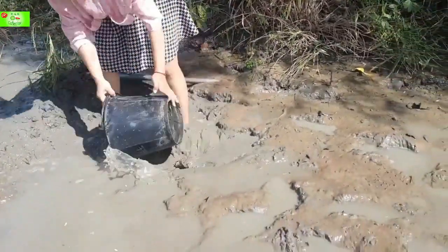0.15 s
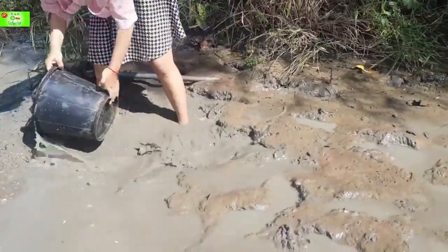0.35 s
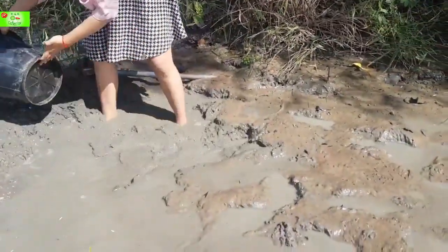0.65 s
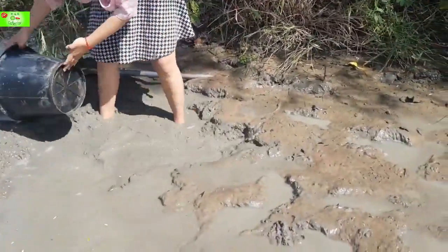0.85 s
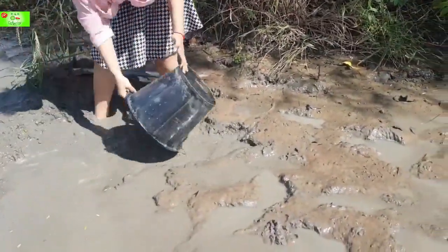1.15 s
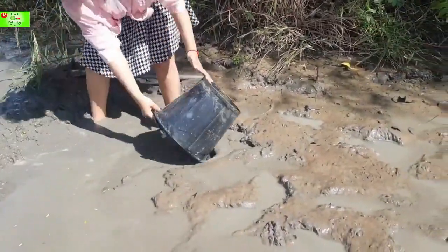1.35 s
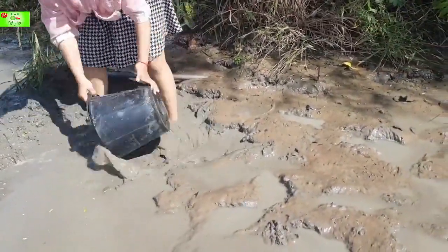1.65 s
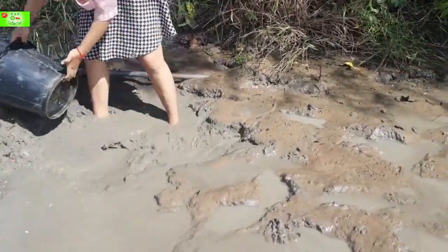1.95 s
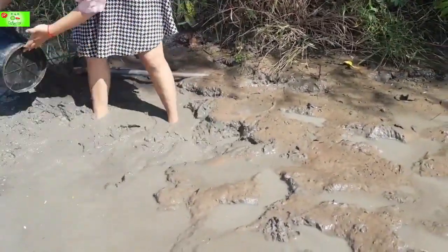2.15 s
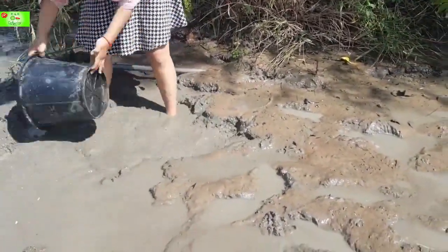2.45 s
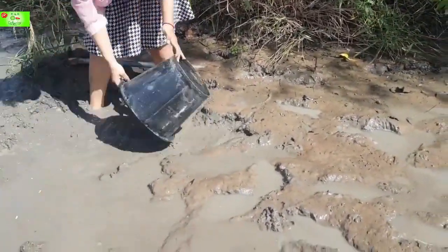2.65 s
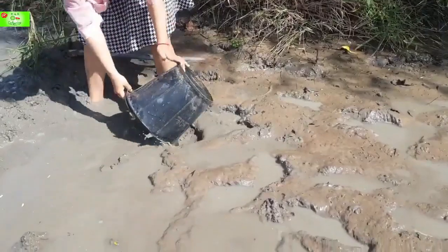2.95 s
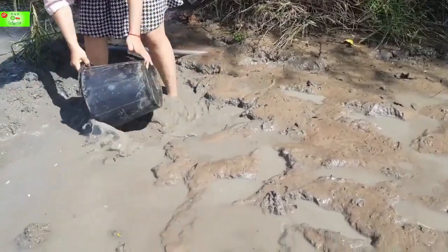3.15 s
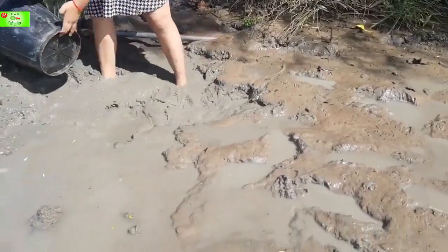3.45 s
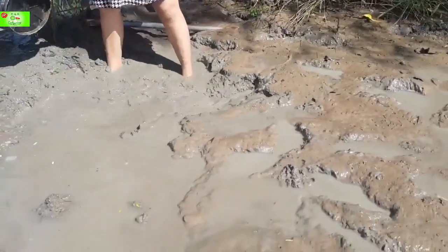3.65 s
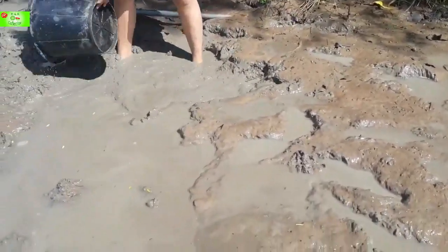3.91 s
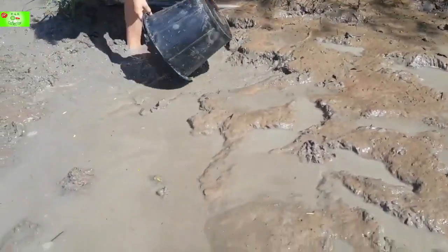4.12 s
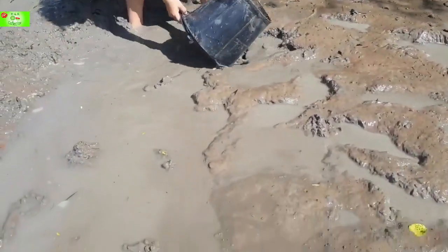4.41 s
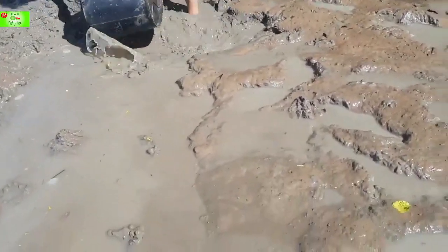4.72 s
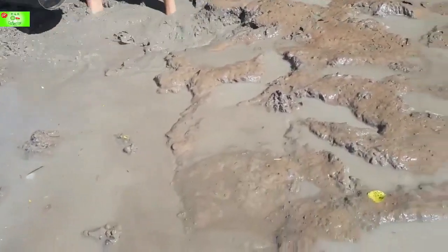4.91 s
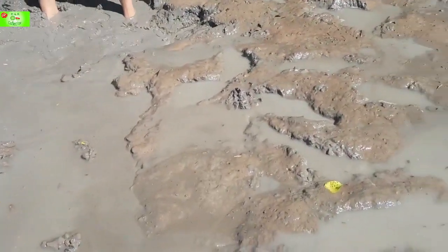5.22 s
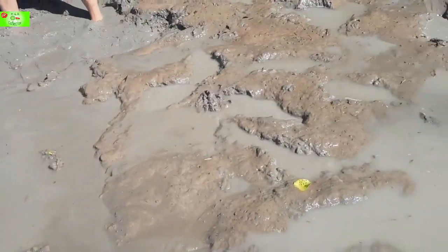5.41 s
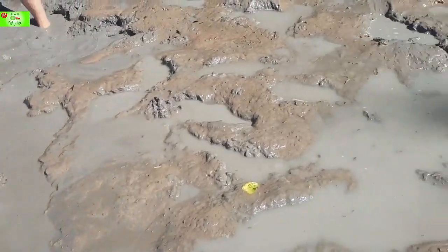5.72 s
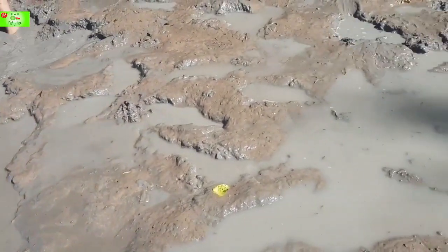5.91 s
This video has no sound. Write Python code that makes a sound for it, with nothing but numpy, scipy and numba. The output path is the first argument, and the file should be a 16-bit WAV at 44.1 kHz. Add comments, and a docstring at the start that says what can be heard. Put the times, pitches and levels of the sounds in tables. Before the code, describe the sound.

Four rhythmic bucket throws in a shallow muddy pool: low glug, quick swish, then a bubbly wet crash, with drips and quiet gaps between.

```python
"""Water in a shallow muddy pool is bailed with a plastic bucket: four swings, each a gulp as the rim dips, a swish
as it scoops, and a thrown sheet that patters and slaps down further left. Bubbles and droplets are short ringing
tones, fine spray is a crowd of tiny ones, and slaps are fading bursts of noise. A phone with two ports hears it
in the open air, with a muddy bank that scatters the sound, a little wind and a faint hush behind."""
import sys
import numpy as np
from scipy import signal
from scipy.fft import rfft, irfft
from scipy.io import wavfile
from scipy.ndimage import uniform_filter1d, map_coordinates
from numba import njit

SR = 44100
rng = np.random.default_rng(int(sys.argv[2]) if len(sys.argv) > 2 else 0)


def put_to_file(sound):
    """Save the sound as 16-bit audio at rate SR, in the file named by the first command-line argument."""
    columns = np.atleast_2d(sound).T  # one column per channel
    safe = np.clip(columns, -1, 1)
    whole_steps = np.round(safe * 32767)
    wavfile.write(sys.argv[1], SR, whole_steps.astype(np.int16))


N = 267687
T = np.arange(N) / SR  # time in seconds

# The bucket scoops. Each row: rim dips in seconds, rim leaves the water in seconds, stir in dB, swish in dB,
# reach of the swing as extra lead of the left port in ms.
SCOOPS = [(0.076, 0.444, 5.5, -6, 0.32), (1.528, 1.906, -2, 1, 0.33), (3.02, 3.409, -3, 1, 0.28),
          (4.556, 4.917, -1.5, -1.5, 0.46)]
# The thrown water comes down. Each row: first drops in seconds, main sheet in seconds, last drops in seconds,
# crash in dB, crash length in seconds, churn in dB, extra droplets in dB, coarse spray in the crash in dB,
# middle bubble pitch in Hz.
THROWS = [(0.56, 0.878, 1.036, -2.5, 0.034, 0, 1, -4.5, 626),
          (2.14, 2.395, 2.557, -1, 0.035, 2, 0.5, -3.5, 605),
          (3.58, 3.91, 4.079, 2.5, 0.034, -1, 0, -2, 645),
          (5.06, 5.385, 5.53, -1, 0.074, -0.5, -1.5, 3.5, 583)]
SCOOP_S = 0.057  # how long the stir of a scoop holds, in seconds
SCOOP_SLOPES = (58, 31)  # its rise and fall, in dB per second


def undb(db):
    """Turn decibels into a gain."""
    return 10 ** (np.asarray(db) / 20)


def curve(rows, at=T):
    """Join the columns of a table by straight lines in time."""
    s, *columns = np.transpose(rows)
    return [np.interp(at, s, column) for column in columns]


def unit(x):
    """Scale a sound to rms 1."""
    return x / np.sqrt(np.mean(x ** 2))


def steady(x, span_s):
    """Even out the slow level of a texture and keep its grain."""
    power = np.mean(x ** 2, axis=0)
    for _ in range(2):
        power = uniform_filter1d(power, max(int(span_s * SR), 2))
    return x / np.sqrt(np.abs(power) + 1e-4 * power.mean())


def colour(x, points, size=2048):
    """Filter through (Hz, dB) points without any sound ahead of its cause."""
    hz, db = np.transpose(points)
    grid = np.maximum(np.arange(size // 2 + 1) * SR / size, 1)
    cepstrum = irfft(np.log(undb(np.interp(np.log(grid), np.log(hz), db))))
    # folding the cepstrum puts the whole response after time zero
    cepstrum[1:size // 2] *= 2
    cepstrum[size // 2 + 1:] = 0
    response = irfft(np.exp(rfft(cepstrum)))
    return signal.oaconvolve(x, response[None], axes=1)[:, :N]


def walk(corner_hz):
    """Smooth random wandering with spread 1, no faster than about the corner."""
    lowpass = signal.butter(2, corner_hz, fs=SR, output="sos")
    return unit(signal.sosfilt(lowpass, rng.standard_normal(N)))


def bursts(rows):
    """Noise that starts at once and fades, for rows of start in seconds, level in dB, fade time in seconds."""
    force, t = np.zeros(N), T[:SR // 10]
    for s, db, fade in rows:
        first = int(s * SR)
        force[first:first + len(t)] += undb(db) * np.exp(-t / fade)
    return (force * rng.standard_normal(N))[None]


def bearing(at=T):
    """Lead of the left port in ms: it grows as each swing carries the water to the left."""
    dip_lead_ms, carry_s = 0.045, 0.63  # lead at the dip; pace of the swing to the left
    return_s = 0.18  # the bucket is back this long before a dip
    dip, *_, reach = np.transpose(SCOOPS)
    k = np.maximum(np.searchsorted(dip - return_s, at) - 1, 0)  # which swing it is
    carried = 1 - np.exp(-np.maximum(at - dip[k], 0) / carry_s)
    return dip_lead_ms + reach[k] * carried


def ports(x):
    """One source as both ports hear it: the right one hears it later."""
    lead = bearing() * SR / 1000
    return np.array([x, map_coordinates(x, [np.arange(N) - lead], order=3)])


@njit
def rings(start, hz, cycles, size, rise, onset):
    """Damped sines that speak within `onset` cycles and whose pitch climbs by `rise` in each decay time."""
    out = np.zeros(N)
    for k in range(len(start)):
        life = cycles[k] / hz[k]
        first = max(int(start[k] * SR) + 1, 0)
        last = min(int((start[k] + 5 * life) * SR), N)
        for i in range(first, last):
            t = i / SR - start[k]
            age = t / life
            level = size[k] * min(t * hz[k] / onset, 1.) * np.exp(-age)
            out[i] += level * np.sin(2 * np.pi * hz[k] * t * (1 + rise * age / 2))
    return out


def grains(start, hz, cycles, size, rise, onset, stray_ms=0):
    """Rings as both ports hear them, each with the lead of its own place."""
    lead = (bearing(start) + stray_ms) / 1000
    return np.array([rings(start + side * lead / 2, 1. * hz, 1. * cycles, 1. * size, float(rise), float(onset))
                     for side in (-1, 1)])


def shower(flow_db, low_hz, high_hz, cycles, rise, spread_db, stray_ms, full_db, count):
    """Random grains with pitches between two limits; the stronger the flow, the more of them."""
    when, keep, pitch, damp, big, sign, aside = rng.random((count, 7)).T
    start = when * N / SR
    strength, low, high = (np.interp(start, T, np.broadcast_to(c, N)) for c in (flow_db, low_hz, high_hz))
    live = keep < undb(.7 * (strength - full_db))
    hz = low * (high / low) ** pitch
    turns = cycles * 2 ** (2 * damp - 1)
    # small bubbles die sooner, so they start louder to carry the same energy
    size = undb(-spread_db * np.log(0.0099 + big)) * np.sqrt(hz / turns)
    size = np.sign(sign - .5) * size
    stray = stray_ms * np.log((aside + 1e-6) / (1 - aside))
    return grains(start[live], hz[live], turns[live], size[live], rise, 0.43, stray[live])


def stage(start, end, slopes):
    """Level in dB of something that rises, holds from start to end, and falls."""
    rise, fall = slopes
    return -rise * np.maximum(start - T, 0) - fall * np.maximum(T - end, 0)


def flow():
    """Strength in dB of spray, droplets and bubbles: swings scoop, swish out, patter, crash and churn the pool."""
    # what each stage stirs up: spray, droplets and bubbles, in relative dB
    trickle_db, scoop_db, swish_db = (-53, -54.5, -67), (-54.5, -63, -58.5), (-37, -39.5, -44)
    patter_db, crash_db, churn_db = (-38.5, -38.5, -45), (-28, -30, -43), (-39.5, -34.5, -34)
    # how fast each stage comes and goes: rise and fall in dB per second
    swish_slopes, patter_slopes = (119, 190), (82, 106)
    crash_slopes, churn_slopes = (243, 720), (72.6, 95)
    swish_s, churn_s = 0.015, 0.074  # how long these stages hold
    drained_s, drain_db_per_s = 5.66, 28  # the trickle dies away after the last throw

    parts = [(trickle_db, -drain_db_per_s * np.maximum(T - drained_s, 0))]
    for dip, leave, stir, swish, _ in SCOOPS:
        parts += [(scoop_db, stage(dip, dip + SCOOP_S, SCOOP_SLOPES) + stir),
                  (swish_db, stage(leave - swish_s, leave, swish_slopes) + swish)]
    for first, land, last, crash, crash_s, churn, droplets, _, _ in THROWS:
        breakup = np.array([0, droplets, 0])
        parts += [(breakup + patter_db, stage(first, last, patter_slopes)),
                  (breakup + crash_db, stage(land - crash_s, land, crash_slopes) + crash),
                  (breakup + churn_db, stage(land - churn_s, land, churn_slopes) + churn)]
    power = sum(np.outer(undb(mix) ** 2, undb(level) ** 2) for mix, level in parts)
    return 10 * np.log10(power)


def bubble_pitch():
    """Typical pitch in Hz of churned bubbles: it falls through each throw, and is lowest under the sunk bucket."""
    deepen = 2 ** 0.21  # start 0.21 octave above a throw's pitch, end as far below, as the water digs in
    sunk_hz, sunk_s = 384, 0.102  # pitch under the bucket; half its time under water
    points = []
    for first, _, last, *_, hz in THROWS:
        points += [(first, hz * deepen), (last, hz / deepen)]
    open_hz = curve(points)[0]
    sunk = sum(np.exp(-((T - dip - SCOOP_S / 2) / sunk_s) ** 4) for dip, *_ in SCOOPS)
    return open_hz + (sunk_hz - open_hz) * sunk


def coarseness():
    """Coarse spray in dB relative to the fine: each crash breaks the water up in its own way."""
    patter_db, mist_s = 0.5, 0.11  # mix away from the crashes; how long a crash changes it
    crashes = sum((db - patter_db) * np.exp(-((T - land) / mist_s) ** 2) for _, land, *_, db, _ in THROWS)
    return patter_db + crashes


def water(spray_db, droplet_db, bubble_db):
    """Churned air rings as bubbles, falling droplets patter, and fine spray crackles; all come in clumps."""
    # Tone colour of the fine spray. Each row: frequency in Hz, level in dB.
    spray_colour = [(700, -17), (1550, -9.5), (1950, 1), (2450, -4), (3200, 2), (4000, 1), (5400, -4.5),
                    (7800, -4), (10000, -7.5), (12500, -5), (15500, -11)]
    # Tone colour of the churned bubbles. Each row: frequency in Hz, level in dB.
    bubble_colour = [(100, -18), (250, -5), (400, -0.5), (600, 3), (730, 4), (900, 4), (1400, -21.5)]
    droplet_colour = [(600, 7.5), (1150, 1.5), (2000, -3.5), (3000, 6)]
    churn_hz = bubble_pitch()
    clumps = undb(0.87 * walk(24.3))
    bubbles = shower(bubble_db, 0.645 * churn_hz, 1.392 * churn_hz, cycles=2.13, rise=0.044,
                     spread_db=2.0, stray_ms=0.029, full_db=-40.5, count=4500)
    droplets = shower(droplet_db, 1036, 1917, cycles=2.24, rise=0.092,
                      spread_db=-1.0, stray_ms=0.015, full_db=-40, count=6000)
    spray = shower(spray_db, 1576, 15430, cycles=2.92, rise=0.11,
                   spread_db=3.0, stray_ms=0.026, full_db=-37, count=50000)
    # big drops ring low, mist rings high, and the mix keeps changing
    coarse = signal.sosfiltfilt(signal.butter(3, 4300, fs=SR, output="sos"), spray)
    fine = spray - coarse
    spray = fine + coarse * undb(coarseness() + 0.65 * walk(17.7))
    # even out each texture, then let the flow set its level
    bubbles = steady(colour(bubbles, bubble_colour) * clumps, 0.33) * undb(bubble_db)
    droplets = steady(colour(droplets, droplet_colour) * clumps, 0.24) * undb(droplet_db - 3.0)
    spray = steady(colour(spray, spray_colour) * clumps, 0.09) * undb(spray_db - 1)
    return bubbles + droplets + spray


def drips(fall_db):
    """Stray drops fall from the rim and the hands, and land one by one even between the throws."""
    falling = shower(fall_db, 1385, 6560, cycles=5.4, rise=0.065,
                     spread_db=8.5, stray_ms=0.093, full_db=-60.5, count=420)
    falling = colour(falling, [(400, -20), (1300, -3), (4000, 9.0), (12000, -15.0)])
    return unit(falling) * undb(0.88 * fall_db - 27.5)


def air():
    """Wind buffets each port on its own in uneven puffs, over a distant hush."""
    # Tone colour of the wind. Each row: frequency in Hz, level in dB.
    wind_colour = [(15, -20), (52, 5.5), (115, 0.5), (180, -9), (300, -13.5), (700, -39)]
    # Tone colour of the distant hush. Each row: frequency in Hz, relative level in dB per Hz.
    hush_colour = [(59, -18), (100, -8), (253, -30), (340, -3), (429, -22), (627, -5.5), (1040, -18),
                   (1840, -16), (2090, -22), (2520, -46), (5510, -4), (6390, -12), (9340, -7.5),
                   (13700, -12), (15500, -16)]
    # Strength of the wind on the ports. Each row: time in seconds, relative level in dB.
    gusts = [(0.0, -46), (0.22, -48), (0.34, -58), (0.64, -55), (1.42, -74.5), (1.57, -57), (2.69, -57),
             (2.72, -60.5), (4.06, -56.5), (4.38, -77), (4.58, -56), (4.65, -68), (4.7, -53), (5.14, -45),
             (5.29, -71), (5.34, -46), (5.38, -66), (6.07, -74.5)]
    puffs = colour(rng.standard_normal((2, N)), wind_colour) * undb(5.0 * walk(17.0))
    wind = steady(puffs, 0.2) * undb(curve(gusts)[0] + 2.5)
    hush = unit(colour(rng.standard_normal((2, N)), hush_colour)) * undb(-60.5)
    return wind + hush


def drops():
    """A drop or bursting film cracks on the surface and leaves a tiny ringing bubble."""
    # Single drops and bursting films. Each row: start in seconds, relative level in dB, pitch in Hz,
    # crack in dB on top of that level.
    single_drops = [(0.053, -40.5, 4270, 11), (0.119, -37.5, 3070, -8), (0.8032, -26.5, 3660, -9),
                    (1.277, -42.5, 6350, 6.5), (1.392, -40, 3700, -2), (1.502, -40, 2120, 13.5),
                    (2.822, -34.5, 8160, -7), (3.03, -37.5, 4000, -19), (3.255, -34, 5660, 5),
                    (4.1139, -31, 3650, -4), (4.357, -47, 3360, 14), (4.56, -31.5, 5320, -14),
                    (4.6045, -29, 3200, -23), (5.696, -37.5, 3400, -14), (5.705, -37, 6400, -20)]
    s, db, hz, crack_db = np.transpose(single_drops)
    crack = bursts(zip(s, db + crack_db, np.full(len(s), .0014)))
    crack = colour(crack, [(400, 1), (2000, -6), (4500, -4.5), (15000, -1)])
    bubble = grains(s + 0.000345, hz, np.full(len(s), 5.), undb(db + 7.5), rise=0.011, onset=0.99)
    return ports(crack[0]) + bubble


def plops():
    """Large bubbles break in with a knock and chirp upward as they near the surface."""
    # The largest single bubbles. Each row: start in seconds, relative level in dB, pitch in Hz,
    # cycles to fade to about a third (1/e).
    large_bubbles = [(0.061, -25, 577, 2.8), (0.152, -43, 750, 6.8), (0.195, -37.5, 930, 6.7),
                     (0.271, -41.5, 897, 7), (0.404, -33, 533, 4.6), (0.663, -25, 573, 4.9),
                     (0.752, -41, 645, 2.6), (0.781, -20.5, 536, 6), (0.96, -28, 416, 3.4),
                     (1.197, -41, 620, 9.4), (1.543, -29.5, 1040, 3.6), (1.708, -41, 1160, 9.6),
                     (1.904, -28, 630, 2.1), (1.921, -26, 1130, 5.7), (2.223, -51, 615, 12),
                     (2.28, -26, 570, 5.5), (2.319, -23, 450, 9.3), (2.408, -18.5, 632, 4),
                     (2.899, -35, 1040, 4.7), (2.955, -31, 645, 1.4), (3.164, -32.5, 683, 5),
                     (3.297, -38, 538, 5.9), (3.421, -25.5, 970, 4.2), (3.653, -25, 442, 4.7),
                     (3.848, -26, 570, 7.5), (4.389, -38.5, 455, 2.5), (4.433, -33, 524, 5.4),
                     (4.492, -40, 700, 7.4), (4.524, -31.5, 633, 3.4), (4.623, -33, 487, 4.7),
                     (4.674, -29, 1000, 5.3), (4.844, -30.5, 779, 6.2), (4.897, -17.5, 970, 2.2),
                     (4.995, -33.5, 542, 4.2), (5.084, -29, 620, 7.3), (5.168, -24, 610, 7.6),
                     (5.226, -21, 676, 6.9), (5.262, -22.5, 715, 5.5), (5.313, -27, 645, 11.7)]
    s, db, hz, cycles = np.transpose(large_bubbles)
    knock = grains(s, 1.45 * hz, np.full(len(s), 1.3), undb(db - 1.5), rise=0, onset=0.6)
    chirp = grains(s, hz, cycles, undb(db + 0.5), rise=0.159, onset=1.0)
    return knock + chirp


def gulps():
    """The rim cuts in with a short glug, and the air pocket under it falls in pitch as it opens into the bucket."""
    # The rim dips and traps air. Each row: start in seconds, relative level in dB, pitch the pocket settles to
    # in Hz, swell time in seconds, rim splash in dB on top of the pocket.
    rim_dips = [(0.067, -24.5, 302, 0.0077, -11.5), (0.091, -38.5, 286, 0.0084, -18),
                (1.391, -60, 341, 0.013, 13), (1.542, -33.5, 326, 0.0073, 0), (1.582, -48, 296, 0.015, 5.5),
                (3.020, -37, 366.4, 0.016, 4.5), (3.039, -25.5, 311, 0.004, -14),
                (3.078, -42, 278, 0.014, -2), (4.491, -44, 340, 0.0057, 1), (4.522, -33, 348, 0.0084, -10),
                (4.548, -42.5, 275, 0.017, -2), (4.585, -42.5, 249, 0.016, 4)]
    pocket, splash = np.zeros(N), np.zeros(N)
    for s, db, hz, swell, splash_db in rim_dips:
        t = np.maximum(T - s, 0)[:int((s + .2) * SR)]
        # the pitch starts high and settles within a few ms
        phase = 2 * np.pi * hz * (t + 0.00286 * (1 - np.exp(-t / 0.0013)))
        swelling = (t / swell) ** 2 * np.exp(2 - 2 * t / swell)
        pocket[:len(t)] += undb(db) * swelling * np.sin(phase)
        splash[:len(t)] += undb(db + splash_db) * (1 - np.exp(-t / 0.0021)) * np.exp(-t / 0.011)
    splash_colour = [(150, 14), (400, 22.0), (750, 14.0), (1020, 20.5), (1500, -17), (4000, -1.5), (12000, -12.5)]
    wet = colour((splash * rng.standard_normal(N))[None], splash_colour)
    s, db, hz, _, splash_db = np.transpose(rim_dips)
    glug = grains(s, 3.084 * hz, np.full(len(s), 6.), undb(db + splash_db - 0.5), rise=-0.094, onset=2.7)
    return ports(pocket + wet[0]) + glug


def gurgles():
    """Small bubbles blip one by one in the wake of the bucket."""
    pitch_hz = 913
    wake_db = np.max([stage(dip, leave, SCOOP_SLOPES) for dip, leave, *_ in SCOOPS], axis=0)
    blips = shower(wake_db, 0.6 * pitch_hz, 1.76 * pitch_hz, cycles=3.7, rise=0.158,
                   spread_db=1.5, stray_ms=0.039, full_db=2, count=420)
    return unit(blips) * undb(-58.5)


def slaps():
    """Each lump lands with a sharp burst of crackle and a short thud from the cavity it digs."""
    # Lumps of water slap down. Each row: start in seconds, relative level in dB, fade time in seconds,
    # thud in dB on top of that level.
    lumps = [(0.151, -41, 0.023, -9), (0.545, -27.5, 0.017, 7.5), (0.752, -16.5, 0.0018, 8),
             (0.847, -22.5, 0.0097, -3), (0.871, -18.5, 0.011, -23), (1.993, -36, 0.025, -3),
             (2.35, -16, 0.009, 8), (2.368, -17.5, 0.0099, 11), (2.384, -15, 0.0061, 8),
             (3.842, -10.5, 0.0018, -29), (3.862, -12, 0.0022, 0), (3.883, -22, 0.0011, 10),
             (3.904, -8.5, 0.0045, 5), (3.912, -13, 0.0021, -11), (5.334, -13.5, 0.0037, -1)]
    # Tone colour of the crackle. Each row: frequency in Hz, level in dB.
    slap_colour = [(60, -32.5), (250, 3.5), (550, -4.5), (950, 9), (1400, 15), (2400, -2), (3800, 11),
                   (5500, -1), (8000, -3), (12500, -5.5), (16000, -12)]
    s, db, fade, thud_db = np.transpose(lumps)
    thud_hz = rng.uniform(460, 632, len(s))
    thuds = grains(s, thud_hz, np.full(len(s), 1.5), undb(db + thud_db - 4.5), rise=0.22, onset=0.67)
    crackle = colour(bursts(zip(s, db, fade)), slap_colour)[0]
    return undb(-4) * ports(crackle) + thuds


def bank(x, count=4):
    """Mud ridges scatter the treble along shifting paths; the grassy bank adds a faint short tail."""
    t, out = T[:SR // 4], 0
    fades = np.array([np.exp(-t / 0.0087), np.exp(-t / 0.015)])
    for _ in range(count):
        near, far = rng.standard_normal((2, 2, len(t))) * fades[:, None]
        echo = (undb(-5.0) * unit(near) + undb(-7.0) * unit(far)) / np.sqrt(len(t) * count)
        # each path comes and goes as the water moves
        out = out + signal.oaconvolve(x * walk(15.6), echo, axes=1)[:, :N]
    return colour(out, [(300, -7.5), (1200, -6), (2500, 1), (8000, 3.0)])


def scene():
    """All the water, slightly to the left, in the open air."""
    spray_db, droplet_db, bubble_db = flow()
    pool = water(spray_db, droplet_db, bubble_db) + drips(spray_db)
    pool = pool + drops() + plops() + gulps() + gurgles() + slaps()
    pool = pool * undb(-1.5)
    sides = undb([[.55], [-.55]])  # left a little louder than right
    return (pool + bank(pool)) * sides + air()


def record(dry):
    """The phone cuts the top: a steep low-pass at 15.9 kHz."""
    return signal.sosfilt(signal.ellip(10, .2, 80, 15900, fs=SR, output="sos"), dry)


dry = scene()
out = record(dry)
put_to_file(out)
```